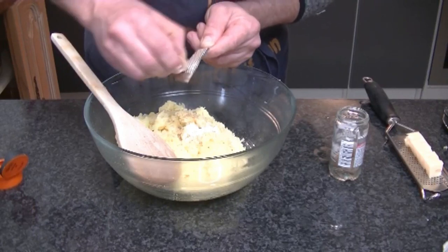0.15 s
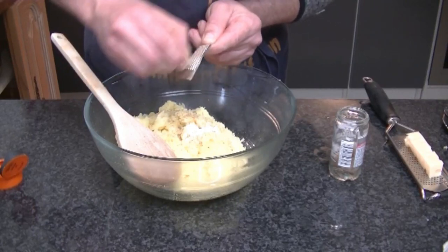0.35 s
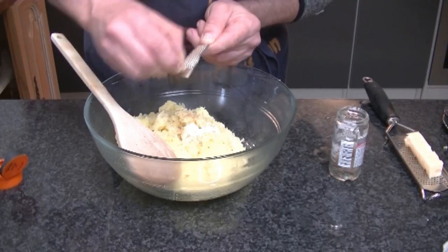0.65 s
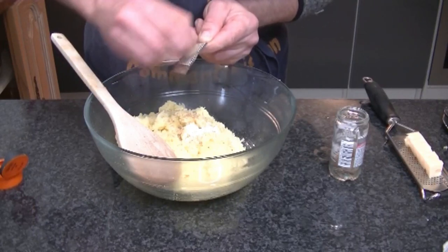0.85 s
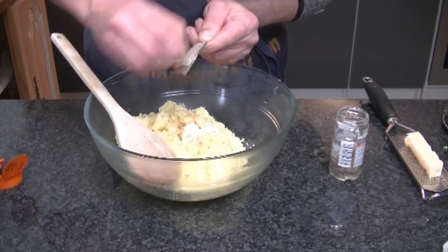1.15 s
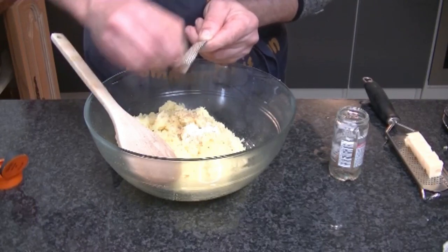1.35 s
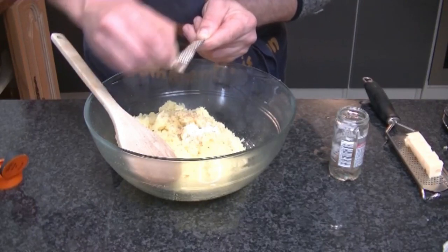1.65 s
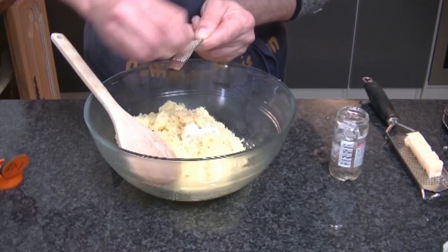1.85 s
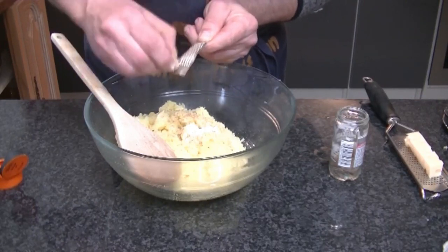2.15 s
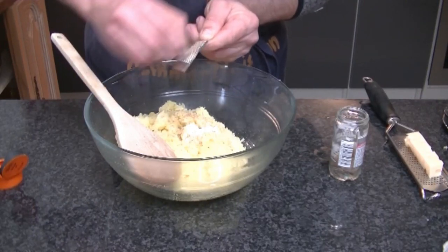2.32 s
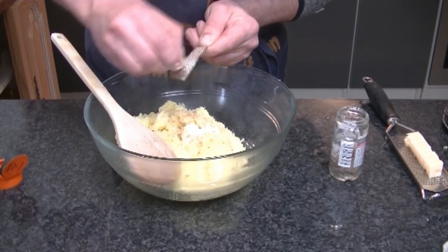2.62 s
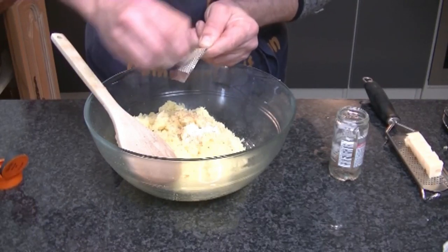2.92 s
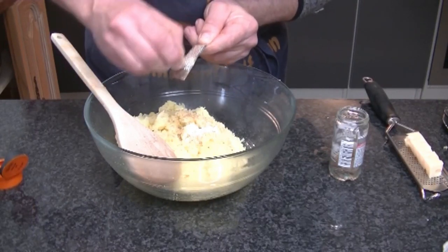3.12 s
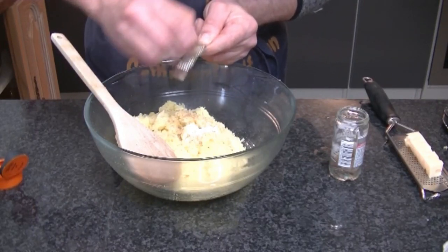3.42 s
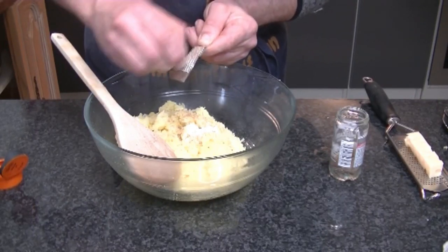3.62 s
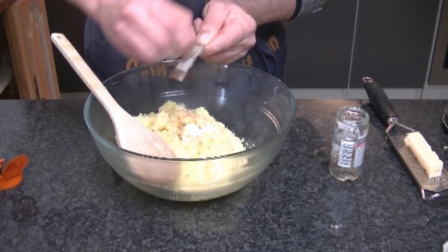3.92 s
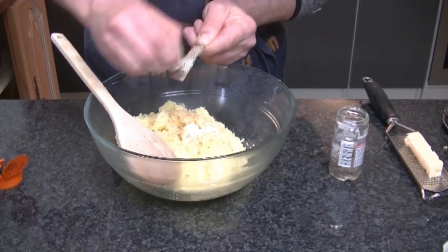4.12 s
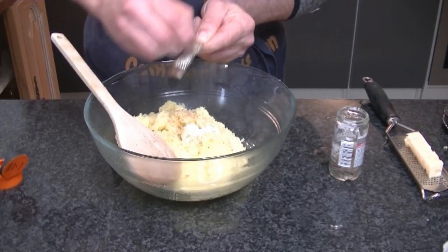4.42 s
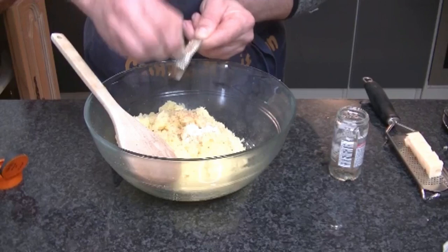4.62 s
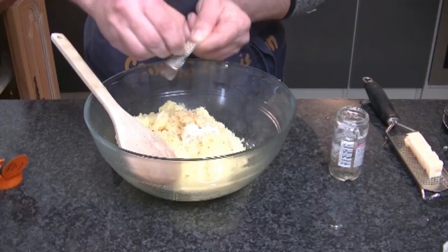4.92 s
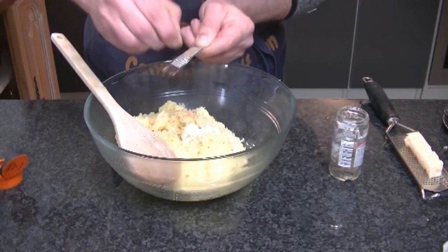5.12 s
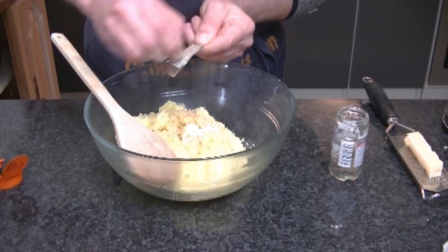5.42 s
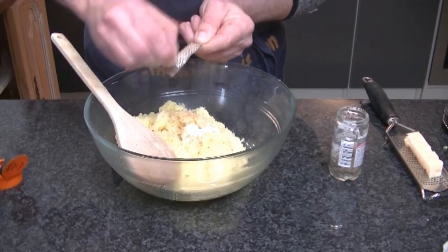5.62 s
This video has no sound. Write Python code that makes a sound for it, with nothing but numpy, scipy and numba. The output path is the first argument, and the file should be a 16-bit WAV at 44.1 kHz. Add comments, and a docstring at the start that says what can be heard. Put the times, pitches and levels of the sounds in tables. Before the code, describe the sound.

Close to the microphone in a hard-surfaced kitchen, a small nutmeg is rasped on a thin hand-held steel grater over a glass bowl. From 0 s the strokes run without a gap, down and back alternating, about twelve a second, each a short gritty scrape that swells and eases. Dense clicks and dry crackle ring briefly in the damped metal, mostly 2 to 7 kHz, with clumpy fine hiss above. From about 1 to 2.5 s the down strokes bite harder, with bright pinging snags; afterwards the rasp is lighter and more even. It stops near 4.6 s. Six sharp, woody-metallic knocks follow at about 4.7, 4.87, 5.02, 5.17, 5.31 and 5.45 s, the fourth with a small bounce. Softer rasping returns from 5.5 s to the end. A faint bowl hum near 350 Hz, slight rumble, short bright room reflections, quiet room tone and microphone hiss lie beneath.

```python
"""A nutmeg rasped up and down a small steel grater over a glass bowl, with a pause for six knocks, one with a bounce.
Teeth catch as dense clicks, snags and crackle that ring in the damped sheet; shavings add clumped treble hiss.
Knocks are filtered blows plus decaying band noise. The bowl's air hums through a resonator as the hand rubs.
A hard kitchen answers by convolution with decaying noise, over rumble, faint room tone and microphone hiss."""
import sys
import numpy as np
from scipy import signal
from scipy.fft import rfft, irfft, next_fast_len
from scipy.io import wavfile
from scipy.ndimage import uniform_filter1d
from numba import njit

SR = 44100
rng = np.random.default_rng(int(sys.argv[2]) if len(sys.argv) > 2 else 0)


def materialize(psi):
    """Save the field psi as 16-bit PCM at rate SR to the path in sys.argv[1].

    A 1-D psi becomes a single channel; in a 2-D psi each row is a channel.
    """
    bounded = np.clip(np.atleast_2d(psi).T, -1, 1)
    quanta = np.round(bounded * 32767).astype(np.int16)
    wavfile.write(sys.argv[1], SR, quanta)


N = 253883

# grating strokes: (start [s], direction, time to full force [ms], full force [dB])
STROKES = [(0, "back", 3.5, -48), (0.021, "down", 53, -31), (0.102, "back", 12, -27.5),
           (0.2, "down", 39, -35), (0.283, "back", 35, -38.5), (0.369, "down", 34, -33),
           (0.445, "back", 6.2, -33), (0.532, "down", 46, -32.5), (0.611, "back", 20, -33.5),
           (0.694, "down", 48.5, -27.5), (.774, "back", 20, -29), (0.86, "down", 32, -26),
           (0.942, "back", 35, -29.5), (1.024, "down", 56, -29), (1.113, "back", 13, -31.5),
           (1.199, "down", 42, -21.5), (1.28, "back", 8.7, -30.5), (1.363, "down", 45, -24.5),
           (1.445, "back", 12, -33), (1.524, "down", 53, -28.5), (1.603, "back", 34, -32),
           (1.689, "down", 49, -22.5), (1.772, "back", 34, -34), (1.856, "down", 33, -30),
           (1.941, "back", 32, -36), (2.02, "down", 45, -28), (2.104, "back", 9, -29.5),
           (2.192, "down", 37, -26.5), (2.27, "back", 16, -33), (2.351, "down", 33, -28.5),
           (2.435, "back", 5.6, -32.5), (2.516, "down", 29, -28), (2.594, "back", 10, -30),
           (2.68, "down", 49, -34.5), (2.759, "back", 19, -32), (2.851, "down", 55, -31.5),
           (2.932, "back", 5.3, -26.5), (3.025, "down", 34, -36), (3.105, "back", 12, -36),
           (3.184, "down", 38, -36), (3.259, "back", 8.4, -32.5), (3.355, "down", 38, -37),
           (3.43, "back", 22, -34.5), (3.511, "down", 57, -35.5), (3.598, "back", 19, -32.5),
           (3.698, "down", 47, -35), (3.77, "back", 23, -30.5), (3.868, "down", 53, -35),
           (3.947, "back", 8.5, -29), (4.049, "down", 36, -34), (4.12, "back", 16, -35),
           (4.207, "down", 49, -31.5), (4.285, "back", 15, -31.5), (4.377, "down", 35, -35.5),
           (4.45, "back", 8.5, -31.5), (4.535, "down", 28, -31), (5.495, "down", 32, -34),
           (5.574, "back", 31, -37), (5.658, "down", 43.4, -33.5), (5.729, "back", 18, -34.5)]
STROKE_MS, SHORTEST_FADE_MS = 54.5, 13.5   # touch to 15 dB faded, unless the shortest fade outlasts it


def hand():
    """Each stroke swells to full force, then eases as the hand slows towards the turn.
    Returns force and hiss (gains), brightness (dB) and number of the latest stroke."""
    force, hiss, bright, which = np.zeros(N), np.zeros(N), np.zeros(N), np.zeros(N, int)
    for k, (start_s, way, rise_ms, full_db) in enumerate(STROKES):
        bite_db, bright_db, hiss_db = by_way(way, full_db)
        at = max(round(start_s * SR), 0)
        fade_ms = max(STROKE_MS - rise_ms, SHORTEST_FADE_MS)
        ms = 1000 * np.arange(min(N - at, SR // 4)) / SR
        span = slice(at, at + len(ms))
        swell_db = min(bite_db - full_db, 0) * np.clip(1 - ms / max(rise_ms, 1), 0, 1) ** 1.2
        easing_db = -15 * (np.maximum(ms - rise_ms, 0) / fade_ms) ** 1.6
        push = np.minimum(ms / 3, 1) * from_db(full_db + swell_db + easing_db)
        # hiss follows force less
        shave = np.minimum(ms / 9, 1) * from_db(hiss_db + 0.028 * swell_db + 0.24 * easing_db)
        force[span] = np.maximum(force[span], push)
        hiss[span] = np.maximum(hiss[span], shave)
        bright[at:], which[at:] = bright_db, k
    return force, hiss, bright, which


# direction: ((first bite [dB], brightness [dB], hiss [dB]) at usual force, (gain of each [dB per dB of force]))
DIRECTIONS = {"down": ((-51, 7, -52), (0.0, 0.31, 0.5)), "back": ((-42, 3.5, -52.5), (-0.5, 1, 0.19))}
USUAL_FORCE_DB = -35


def by_way(way, full_db):
    """First bite, brightness and hiss (dB) depend on stroke direction and full force."""
    usual, gains = np.array(DIRECTIONS[way])
    return usual + gains * (full_db - USUAL_FORCE_DB)


# teeth that snag hard: (time [s], level [dB], favoured pitch [Hz], other modes [dB])
HARD_SNAGS = [(.0423, -26, 3060, -5), (.0540, -24, 2280, -9), (.0786, -16.5, 4670, -20),
              (.1175, -20, 3360, 2), (.3193, -22.5, 2770, -8), (.4045, -23, 3260, -5),
              (.4136, -23.5, 3470, 5), (.4643, -25.5, 3260, 8), (.4779, -19, 2570, -18),
              (.4842, -31, 3200, -4), (.5731, -34, 2280, 2), (.5850, -24, 2400, -2),
              (.6306, -24.5, 2410, -26), (.7387, -26.5, 3330, 13), (.7776, -16, 4470, -14),
              (.888, -17, 2240, -16), (.9009, -21.5, 3800, 10.5), (1.0311, -21, 5200, 1),
              (1.0402, -27, 3130, 2), (1.0535, -25, 4830, -1), (1.0556, -25, 2300, -12),
              (1.0602, -21, 5600, -2), (1.0655, -19, 2260, 4), (1.0714, -19, 3800, 5),
              (1.0815, -24, 4720, -8), (1.0836, -10, 4790, -29), (1.0893, -24, 4870, -14),
              (1.1143, -28, 4900, -6), (1.1341, -18.5, 2150, -8), (1.2244, -15, 4870, 4),
              (1.2308, -14.5, 4870, 7.5), (1.236, -26, 3260, 8), (1.2494, -11.5, 4790, -23),
              (1.2792, -25, 4900, -6), (1.3008, -23, 4800, 3.5), (1.3872, -24, 5330, 5),
              (1.3969, -11, 5040, 3), (1.4034, -11.5, 5430, -2), (1.4165, -12.5, 4780, -13),
              (1.4711, -23, 5000, -6), (1.5382, -26, 3140, -3), (1.5622, -23, 5250, -6),
              (1.5694, -6.5, 5040, -0.5), (1.6105, -26, 5200, -6), (1.619, -25, 3340, 3),
              (1.6299, -26, 3300, -8), (1.7297, -7, 5070, 1), (1.7321, -18, 5030, -2),
              (1.7379, -17.5, 3240, -6), (1.7439, -4.5, 4850, -23), (1.7718, -29, 5170, -12),
              (1.7875, -26, 3340, -11), (1.8071, -28, 4950, -2), (1.8866, -14, 5440, -1),
              (1.8951, -12, 4400, 3.5), (1.9045, -9, 5150, -25), (2.0462, -19, 5640, -6),
              (2.0579, -18, 5200, 10), (2.0691, -5, 5200, -34), (2.1204, -14, 5200, 5),
              (2.215, -18, 5400, -15), (2.221, -12, 5820, -20), (2.2268, -17, 5300, -9),
              (2.2302, -14, 3720, 1.5), (2.2420, -17, 5120, -5), (2.2643, -22, 5100, -23),
              (2.2797, -30, 3320, -2), (2.3143, -30, 3270, 1), (2.3599, -27, 6600, -1),
              (2.389, -16, 5530, -21), (2.3966, -20, 5300, -1), (2.409, -13.5, 4230, -13),
              (2.4395, -25, 5250, -9), (2.4532, -19, 2300, -5), (2.4698, -29, 3440, -6),
              (2.5216, -25, 5500, -11), (2.5531, -17.5, 5630, 2), (2.6007, -22, 5200, 2),
              (2.6914, -27.5, 5300, 4), (2.7222, -20.5, 5670, -15), (2.7317, -24, 5700, -4),
              (2.7611, -28.5, 3900, -6), (2.7831, -26, 5000, -6), (2.879, -18, 4140, 1),
              (2.8857, -17, 4300, -2), (2.8935, -35, 5300, -4), (2.9035, -33, 5550, -12),
              (2.9157, -15.5, 4880, -14), (2.9376, -16, 5400, -6), (2.9415, -32, 5200, -16),
              (2.9556, -27, 3470, 9), (2.9646, -16.5, 3470, -16), (2.9715, -18, 3330, -9),
              (3.0325, -25, 5700, -7), (3.1099, -22, 2240, -7), (3.1155, -26, 3680, -12),
              (3.1292, -20, 3260, 1.5), (3.266, -21.5, 2300, -12), (3.2875, -19.5, 4330, -9),
              (3.4521, -31, 3260, 2), (3.4769, -25, 5460, -9), (3.5589, -24, 5690, -6),
              (3.5643, -21, 5600, -15), (3.6099, -32, 3900, 12), (3.6192, -22, 2200, 0),
              (3.7484, -23, 5250, 0), (3.7852, -26, 2280, -8), (3.8948, -32, 3750, -4),
              (3.9098, -27, 2300, -6), (3.9564, -23.5, 3740, 9.5), (3.963, -13.5, 2330, 3.5),
              (3.9855, -33, 3720, -4), (4.0711, -24, 5650, -4), (4.1245, -29.5, 2260, 6),
              (4.2107, -29, 5500, -9), (4.2416, -13, 5600, -21), (4.2497, -19, 5770, -8),
              (4.2601, -19.5, 5200, -16), (4.2929, -21, 5550, 0), (4.3008, -21.5, 5770, 4),
              (4.4118, -17.5, 5600, -12), (4.4669, -13.5, 2150, -1.5), (4.5579, -17, 4520, 5.5),
              (4.5632, -11.5, 5600, -13.5), (4.5739, -18, 5320, -12), (5.5204, -23, 2300, -12),
              (5.5746, -32, 5550, 8.5), (5.6928, -30, 2300, -8), (5.7447, -37, 4400, -1)]
TICK_MS, TICK_DB, TICK_HZ = 4.8, -1, 5200   # first tooth of a stroke: delay, level over bite, pitch
SMALL_SNAGS, SMALL_SNAG_DB, SMALL_SNAG_TOP_DB = 240, 5.5, -20   # count, level over force, ceiling


def all_snags(force):
    """Hard snags, the first tooth of each stroke, and small random snags that follow the force."""
    ticks = []
    for start_s, way, rise_ms, full_db in STROKES:
        bite_db = by_way(way, full_db)[0]
        ticks.append((start_s + TICK_MS / 1000, bite_db + TICK_DB, TICK_HZ, -2.5))
    when, size, pitch, breadth = rng.random((SMALL_SNAGS, 4)).T
    force_db = 20 * np.log10(force[(when * N).astype(int)] + 1e-6)
    level_db = np.minimum(force_db + SMALL_SNAG_DB, SMALL_SNAG_TOP_DB) - 6 * size
    small = np.transpose([when * (N - 1) / SR, level_db, 2250 * 2.6 ** pitch, 3 - 14 * breadth])
    return np.vstack([HARD_SNAGS, ticks, small])


# modes of the hand-damped steel sheet: (frequency [Hz], width [Hz], relative level [dB])
SHEET_MODES = [(1735, 160, -8), (2287, 64, 1.5), (2460, 740, -14), (3070, 86, 0.5), (3260, 145, -1),
               (3580, 92, 1), (3828, 81, 4.5), (4300, 380, -14), (4815, 127, -1), (5143, 100, 7),
               (5295, 140, -13), (5540, 200, 4.5), (5650, 750, -17), (6350, 800, -38), (6420, 160, -3.5),
               (6700, 740, -16)]
DETUNE, DETUNE_PER_S = 0.026, 12.8   # grip and nut bend the sheet: rms share of pitch, rate


def grater(force, bright, which, snags):
    """Teeth catch at random on every damped mode; a snag favours the modes near its pitch."""
    teeth, out = grains(per_s=2000., spread_db=3.5), np.zeros(N)
    time_s, snag_db, pitch_hz, others_db = snags.T
    at = np.round(time_s * SR).astype(int)
    luck = rng.normal(0, 1, (len(at), len(SHEET_MODES)))
    path = rng.normal(0, 1, (len(STROKES), len(SHEET_MODES)))   # every stroke crosses other teeth
    ring_rms = np.sqrt(SR / (4 * np.pi * 200))   # 200 Hz wide ring driven by unit noise
    # hard pushes end in snags rather than even cutting
    steady = force / (1 + (force / from_db(-34.0)) ** 2) ** 1.06
    for k, (hz, width_hz, level_db) in enumerate(SHEET_MODES):
        lean = np.clip(np.log2(hz / 3500) / 0.5, -.5, .5)   # bright strokes favour upper modes
        # heavy-tailed, so few catches drive a mode hard
        grip = np.clip(rng.normal(0, 1, N) ** 2 * rng.normal(0, 1, N) / 2, -2.5, 2.5)
        strength_db = level_db - 8.5 + lean * (bright - 5) + 1.8 * path[which, k]
        drive = teeth * grip * steady * from_db(strength_db) * width_hz / 200 / ring_rms
        far_db = others_db - 13.5 + .5 * level_db + 3 * luck[:, k]
        near_db = np.maximum(-60 * np.abs(np.log2(hz / pitch_hz)), far_db)
        drive[at] += from_db(snag_db - 5.0 + near_db) * (-1) ** k
        contact = band_pass(drive, 1, hz / 1.113, hz * 1.115)   # soft nut: no sharp click
        turn = 2 * np.pi * hz / SR * (1 + DETUNE * wander(DETUNE_PER_S))
        out += ring_moving(contact, turn, np.exp(-np.pi * width_hz / SR))
    return band_pass(out, 4, 1550, 8200)   # a small sheet radiates no bass


SNAP_RISE_MS, SNAP_MS = 0.4, 0.89   # time constants


def snaps(snags):
    """A tooth letting go starts each snag with a quickly damped sine at its own pitch."""
    out, t = np.zeros(N + 400), np.arange(400) / SR
    for time_s, level_db, pitch_hz, others_db in snags:
        shape = (1 - np.exp(-1000 * t / SNAP_RISE_MS)) * np.exp(-1000 * t / SNAP_MS)
        snap = from_db(level_db) * shape * np.sin(2 * np.pi * pitch_hz * t)
        out[round(time_s * SR):][:len(t)] += snap
    return signal.sosfilt(signal.butter(3, 1500, "high", fs=SR, output="sos"), out[:N])


CRACKLE_PER_S, CRACKLE_DB, CRACKLE_CYCLES = 1600., -13, 13.1   # rate, output gain, ring length


def crackle(force, which):
    """Breaking fibres tick short and dry at scattered pitches, each stroke in its own colour."""
    ticks = grains(CRACKLE_PER_S, spread_db=3.0) * np.minimum(force, from_db(-35.0))
    pitches_hz = np.geomspace(2100, 6800, num=10)
    dealt = rng.integers(0, len(pitches_hz), size=N)
    path = rng.normal(0, 1, (len(STROKES), len(pitches_hz)))
    out = np.zeros(N)
    for k, hz in enumerate(pitches_hz):
        share = ticks * (dealt == k) * from_db(2.41 * path[which, k])
        out += ring(share, hz, 2.73 * hz / CRACKLE_CYCLES)
    return from_db(CRACKLE_DB) * band_pass(out, 4, 1750, 7600)


# spectrum of the dry hiss of shaved nut: (frequency [Hz], relative density [dB per Hz])
DUST_SPECTRUM = [(3000, -27), (6000, 13.5), (7500, 10.5), (9500, 1), (11000, 4.5), (12500, -5.5),
                 (14300, -2), (15700, -6), (16200, -30)]
# high whistling modes: (frequency [Hz], width [Hz], level over hiss envelope [dB])
TREBLE_MODES = [(10400, 420, -14.5), (12970, 420, -13), (14000, 210, -17)]


def dust(hiss, snags):
    """Fine treble hiss clumps per band and whistles in the high modes; snags add short bursts."""
    burst = np.zeros(N)
    for time_s, level_db, pitch_hz, others_db in snags:
        burst[round(time_s * SR)] = from_db(level_db + min(others_db, 0) - 7.5)
    fall = np.exp(-1 / (0.0006 * SR))
    envelope = from_db(6.5) * hiss + signal.lfilter([1], [1, -fall], burst)
    dry_hiss = shaving(envelope, DUST_SPECTRUM)
    edges_hz, out = np.geomspace(2500, 17500, 13), np.zeros(N)
    for low_hz, high_hz in zip(edges_hz, edges_hz[1:]):
        out += band_pass(dry_hiss, 2, low_hz, high_hz) * clumps(per_s=57.0, spread_db=2.5)
    for hz, width_hz, level_db in TREBLE_MODES:
        whistle = rms_one(ring(rng.standard_normal(N), hz, width_hz))
        out += from_db(level_db) * hiss * clumps(per_s=11.0, spread_db=6.5) * whistle
    return out


# spectrum of the dull scuff: (frequency [Hz], relative density [dB per Hz])
SCUFF_SPECTRUM = [(150, -35), (350, -12), (480, -8.5), (600, 1.5), (850, -7), (1050, -3), (1400, -6),
                  (2200, -8), (4000, 1), (8000, -11)]


def scuff(force):
    """Nut, fingers and frame rub dully, following a compressed force."""
    return shaving(from_db(-28.5) * force ** 0.55, SCUFF_SPECTRUM)


# nut on grater: (time [s], level [dB], then level in each rattle band, low to high [dB])
KNOCKS = [(4.7161, -4, -43.5, -44.5, -20.5, -26.5, -17, -32, -12, -30, -26, -37, -35.5, -34, -40),
          (4.865, -4.5, -45, -42.5, -25, -19, -19.5, -34, -10, -26, -30, -36, -40, -34, -44),
          (5.021, -13, -39, -35, -21, -16.5, -16, -29, -18.5, -14, -16.5, -23, -25, -23, -31),
          (5.168, -9.5, -40.5, -36, -31.5, -26.5, -19, -12, -16, -20, -16.5, -24, -30, -40, -38),
          (5.2115, -30.5, -23.5, -29, -25, -11, -13, -9, -21, -10, -9, -22, -18, -27, -29),
          (5.3149, -10, -44, -36, -33, -23, -13, -24, -18.5, -14, -24, -29, -31, -31, -32),
          (5.4477, -17.5, -38, -40, -32, -20, -15.5, -19, -17, -18.5, -30, -30, -33, -36, -35)]
# rattle of the sheet: (low edge [Hz], high edge [Hz], time constant [s], extra level to the room [dB])
RATTLE_BANDS = [(334, 800, 0.0091, 0.5), (910, 1530, 0.008, 0), (1710, 2226, 0.0026, 0.5),
                (2140, 3150, 0.007, 2.5), (3070, 3860, 0.0049, 3), (3900, 4720, 0.0064, -1.5),
                (4840, 5410, 0.0033, -2), (5600, 6440, 0.0054, 5.5), (6650, 7500, 0.0096, 5),
                (7400, 8900, 0.0054, 5), (9550, 11100, 0.0056, 2), (11700, 13200, 0.0077, -3),
                (13300, 15600, 0.006, 0.5)]
BLOW_DB, CONTACT_DB, CONTACT_MS, RATTLE_DB = 3.5, 3.5, 0.53, -2.5   # against band level; time constant
ROOM_EVENS, MIDDLE_DB = 0.19, -13.5   # room hears all sides: share by which bands draw to a middle level


def cracks():
    """A sharp blow and a brief contact crunch set the sheet rattling, each knock in its own colour.
    Returns what the microphone and what the walls receive."""
    out, t = np.zeros((2, N)), np.arange(SR // 10) / SR
    for time_s, knock_db, *bands_db in KNOCKS:
        for (low_hz, high_hz, decay_s, room_db), level_db in zip(RATTLE_BANDS, bands_db):
            shake = rms_one(band_pass(rng.standard_normal(len(t)), 3, low_hz, high_hz))
            blow = band_pass((t == 0) + 1e-18, 3, low_hz, high_hz)
            rattle = from_db(RATTLE_DB) * np.exp(-t / decay_s)
            crunch = from_db(CONTACT_DB) * np.exp(-1000 * t / CONTACT_MS)
            dying = rattle + crunch
            # energy is set, detail is chance
            shake *= np.sqrt(np.sum(dying ** 2) / np.sum((shake * dying) ** 2))
            sound = shake * dying + from_db(BLOW_DB) * blow / np.abs(blow).max()
            # summed over all sides the band is evenly filled
            spread = blow * np.sqrt(np.sum(sound ** 2) / np.sum(blow ** 2))
            walls_db = level_db + room_db + ROOM_EVENS * (MIDDLE_DB - level_db)
            gains = from_db(knock_db + np.array([[level_db], [walls_db]]))
            out[:, round(time_s * SR):][:, :len(t)] += gains * np.array([sound, spread])
    return out


# hand bumps that ring the bowl: (time [s], relative level [dB])
BUMPS = [(0.115, -45), (0.208, -49), (0.619, -56), (0.747, -44), (0.945, -50), (1.117, -47), (1.405, -48),
         (1.611, -48), (1.747, -57), (1.952, -54), (2.028, -62), (2.117, -42), (2.275, -47.5), (2.362, -50),
         (2.449, -43), (2.535, -58), (2.694, -51), (2.858, -46), (2.952, -44), (3.036, -56), (3.109, -54),
         (3.267, -49), (3.572, -51), (3.966, -47), (4.133, -47.5), (4.29, -43.5), (4.466, -44.5),
         (4.717, -63), (5.316, -55), (5.452, -52.5)]
BUMP_DB = 6   # added to every bump
BOWL_HZ, BOWL_WIDTH_HZ = 353.4, 57


def bowl(force):
    """The bowl's air resonates broadly: it hums under rubbing noise and rings at each bump."""
    slow = lag(force ** 0.27, 0.0069)
    noise = ring(rng.standard_normal(N), BOWL_HZ, BOWL_WIDTH_HZ)
    hum = rms_one(band_pass(noise, 2, 260, 450))
    bumps = np.zeros(N)
    for time_s, level_db in BUMPS:
        bumps[round(time_s * SR)] = from_db(level_db + BUMP_DB)
    return from_db(-47.5) * slow * hum + band_pass(ring(bumps, BOWL_HZ, 69), 2, 260, 450)


def rumble(force, knocks):
    """The shaken worktop rumbles faintly and separately at each microphone port; knocks jolt it too."""
    jolt = from_db(1) * lag(np.abs(knocks), 0.024)
    lumps = clumps(per_s=4.0, spread_db=3.5)
    shaken = (force + jolt) ** .5 * lumps * rng.standard_normal((2, N))
    return from_db(-36.5) * band_pass(shaken, 2, 25, 170)


# rasp's filter towards the walls: (frequency [Hz], gain [dB])
TO_WALLS = [(300, -1.5), (1000, 6.5), (2300, 0), (3500, 5), (4400, 0.5), (5000, 1.5), (5700, 1), (7200, 9),
            (12000, -13.5), (15500, 2)]


def to_walls(rasp):
    """The grater radiates unevenly: the walls get another spectrum than the microphone."""
    return tint(rasp, TO_WALLS)


# reverberation: (frequency [Hz], 60 dB decay time [s])
ROOM_T60 = [(300, 0.13), (1500, 0.51), (3500, 0.38), (5300, 0.35), (7500, 0.36), (11000, 0.24),
            (15500, 0.31)]


def kitchen(x):
    """Hard walls answer: noise dying band by band is convolved in, nearly alike at both ports."""
    t, edges_hz = np.arange(SR // 2) / SR, 200 * 2 ** np.arange(0, 6.6, .5)
    tail = np.zeros((2, len(t)))
    for low_hz, high_hz in zip(edges_hz, edges_hz[1:]):
        band = band_pass(rng.standard_normal(tail.shape), 2, low_hz, high_hz)
        tail += band * from_db(-60 * t / at_hz(ROOM_T60, np.sqrt(low_hz * high_hz)))
    # worktop and bowl answer first
    tail *= np.minimum(t / 0.0036, 1) * (1 + 6.7 * np.exp(-t / 0.0037))
    # an irregular room favours no pitch: even out broad bumps
    modes = rfft(tail, SR)
    broad_power = uniform_filter1d(np.abs(modes) ** 2, size=120)
    tail = irfft(modes / np.sqrt(broad_power), SR)[:, :len(t)]
    tail /= np.sqrt(np.sum(tail[0] ** 2))
    mid, side = signal.fftconvolve(x[None], tail, axes=1)[:, :N]
    side = signal.sosfilt(signal.butter(3, 11500, fs=SR, output="sos"), from_db(-9.5) * side)
    return np.array([mid + side, mid - side])


# room tone spectrum: (frequency [Hz], relative density [dB per Hz])
ROOM_TONE_SPECTRUM = [(25, -13), (60, -14), (150, -1), (340, 6.5), (800, -1.5), (2500, -6), (8000, -19),
                      (15500, -47), (16200, -60)]


def room_tone():
    """Steady coloured noise, independent left and right, fills the room faintly."""
    return from_db(-61.5) * colour(rng.standard_normal((2, N)), ROOM_TONE_SPECTRUM)


# microphone hiss spectrum: (frequency [Hz], relative density [dB per Hz])
MIC_HISS_SPECTRUM = [(2000, -20), (5000, 8), (9000, 7), (15600, -5), (16200, -30)]


def mic_hiss():
    """Steady treble noise of the microphone, alike in both channels."""
    return from_db(-67) * colour(rng.standard_normal(N), MIC_HISS_SPECTRUM)


def shaving(envelope, spectrum):
    """Dense, clumped grains under an envelope, coloured."""
    rough = envelope * grains(per_s=9000., spread_db=2.0) * clumps(per_s=82.0, spread_db=3.0)
    return colour(rough, spectrum) * np.sqrt(np.mean(rough ** 2))


def grains(per_s, spread_db):
    """Random clicks, most small and a few large; rms 1."""
    sizes = from_db(spread_db * np.minimum(rng.exponential(1, N), 4)) * rng.choice([-1, 1], N)
    return rms_one(sizes * (rng.random(N) < per_s / SR))


def clumps(per_s, spread_db):
    """Random gain that wanders about per_s times a second."""
    return from_db(spread_db * wander(per_s))


def wander(per_s):
    """Noise that wanders about per_s times a second; rms 1."""
    keep = np.exp(-2 * np.pi * per_s / SR)
    return rms_one(signal.lfilter([1], [1, -2 * keep, keep * keep], rng.standard_normal(N)))


def ring(clicks, hz, width_hz):
    """A unit click starts a decaying sine from height 1."""
    r, w = np.exp(-np.pi * width_hz / SR), 2 * np.pi * hz / SR
    return signal.lfilter([0, np.sin(w)], [1, -2 * r * np.cos(w), r * r], clicks + 1e-18)


@njit
def ring_moving(clicks, turn, keep):
    """A ring whose pitch (radians per sample) moves."""
    out = np.zeros(len(clicks))
    for i in range(2, len(clicks)):
        fed_back = 2 * keep * np.cos(turn[i]) * out[i - 1] - keep * keep * out[i - 2]
        out[i] = fed_back + np.sin(turn[i]) * clicks[i - 1]
    return out


def band_pass(x, order, low_hz, high_hz):
    """Butterworth band-pass."""
    return signal.sosfilt(signal.butter(order, [low_hz, high_hz], "band", fs=SR, output="sos"), x)


def lag(x, time_s):
    """One-pole smoothing with a time constant."""
    keep = np.exp(-1 / (time_s * SR))
    return signal.lfilter([1 - keep], [1, -keep], x)


def tint(x, spectrum):
    """Filter by a table of gains."""
    size = next_fast_len(N)
    gains = from_db(at_hz(spectrum, np.fft.rfftfreq(size, 1 / SR)))
    return irfft(rfft(x, size) * gains, size)[..., :N]


def colour(x, spectrum):
    """Filter by a table of gains; rms 1."""
    return rms_one(tint(x, spectrum))


def at_hz(points, hz):
    """Read a table along log frequency."""
    table = np.array(points)
    return np.interp(np.log(hz + 1), np.log(table[:, 0]), table[:, 1])


def rms_one(x):
    """Scale to unit rms."""
    return x / np.sqrt(np.mean(x ** 2) + 1e-20)


def from_db(db):
    """Decibels to gain."""
    return 10 ** (np.asarray(db) / 20)


def scene():
    """Rasp and knocks in the middle, hum a little left, then room, rumble, room tone and hiss."""
    force, hiss, bright, which = hand()
    snags = all_snags(force)
    rasp = grater(force, bright, which, snags) + snaps(snags) + crackle(force, which)
    rasp = rasp + dust(hiss, snags) + scuff(force)
    knocks, knocks_at_walls = cracks()
    hum = bowl(force) * from_db([[1.8], [-1.8]])
    room = from_db(-10.0) * kitchen(to_walls(rasp) + knocks_at_walls)
    return rasp + knocks + hum + room + rumble(force, knocks) + room_tone() + mic_hiss()


CUTOFF_HZ = 16800


def record(dry):
    """A steep low-pass cuts the top."""
    return signal.sosfilt(signal.cheby2(12, 60, CUTOFF_HZ, fs=SR, output="sos"), dry)


dry = scene()
out = record(dry)
materialize(out)
```